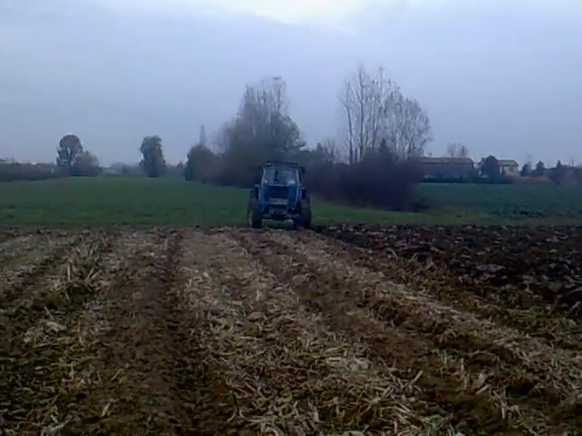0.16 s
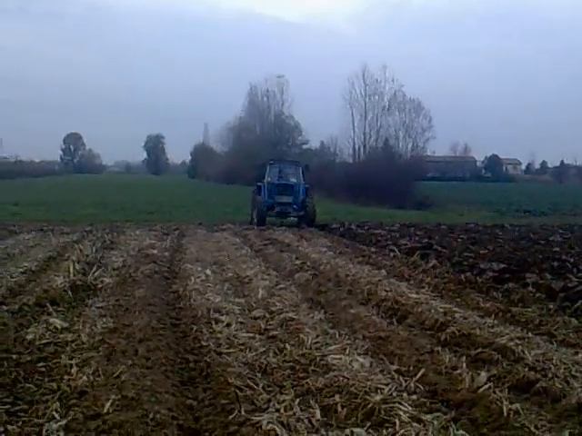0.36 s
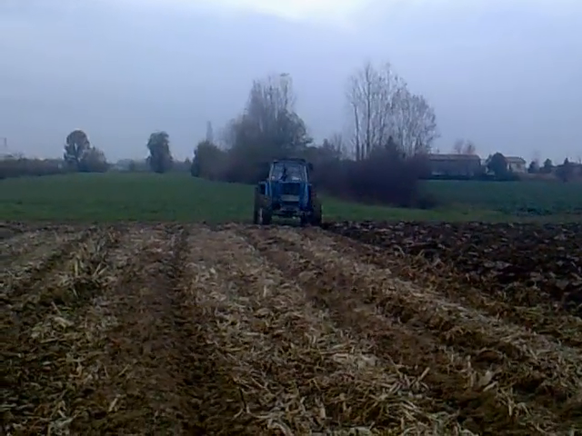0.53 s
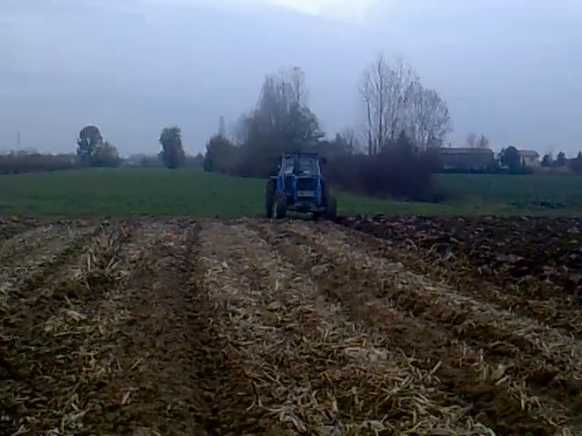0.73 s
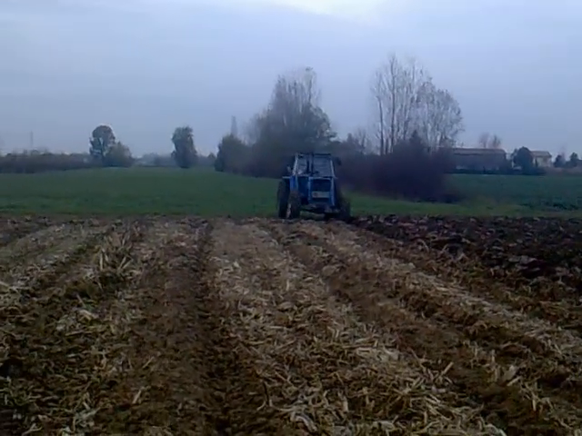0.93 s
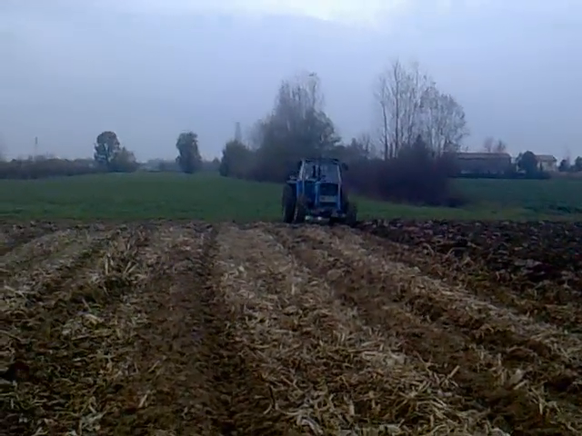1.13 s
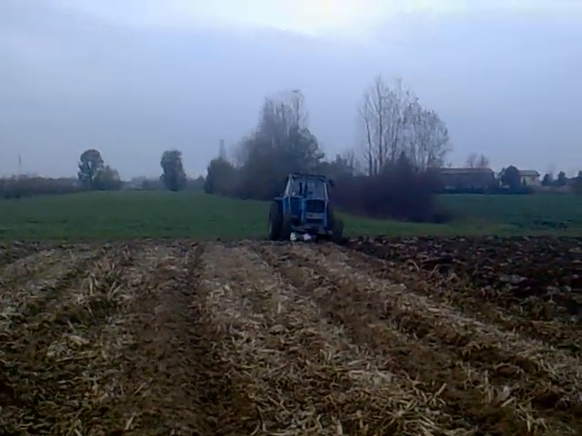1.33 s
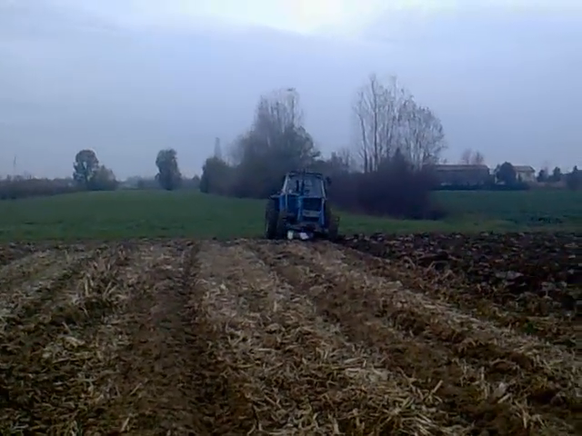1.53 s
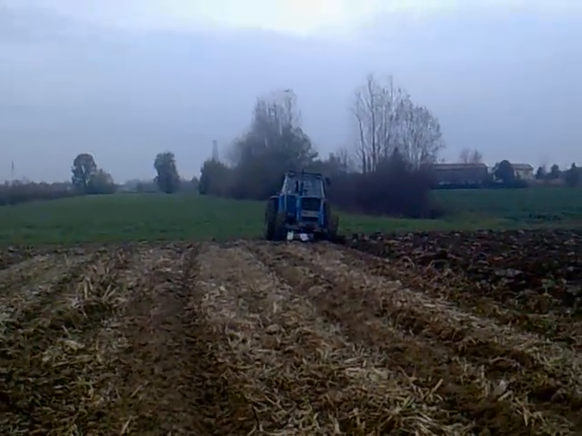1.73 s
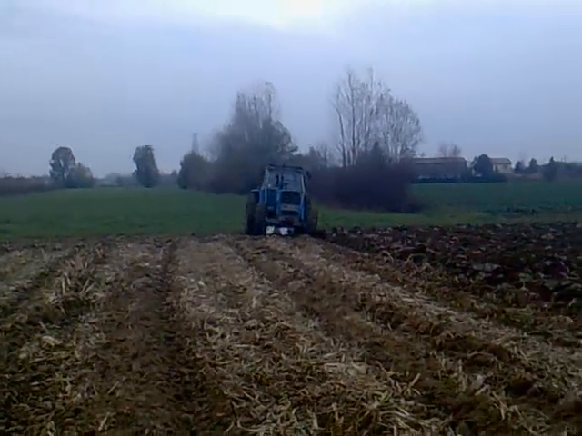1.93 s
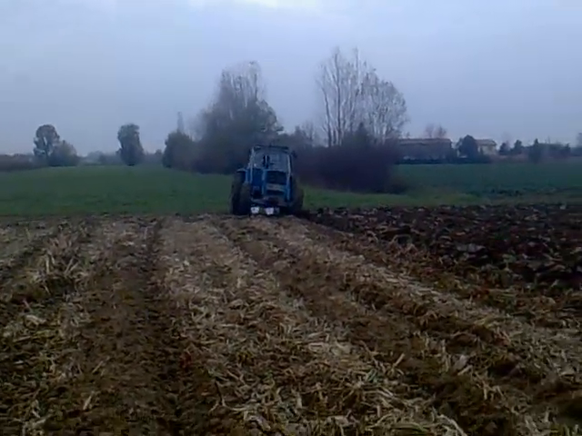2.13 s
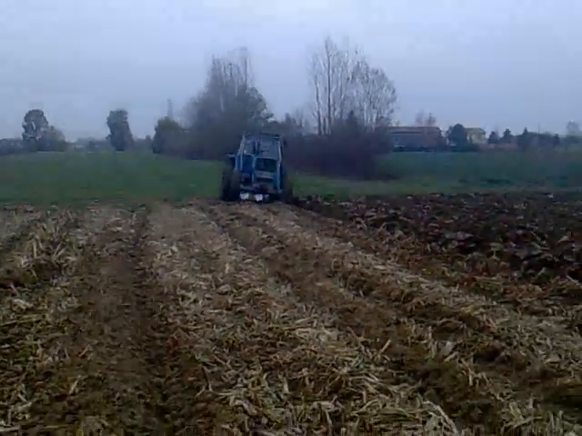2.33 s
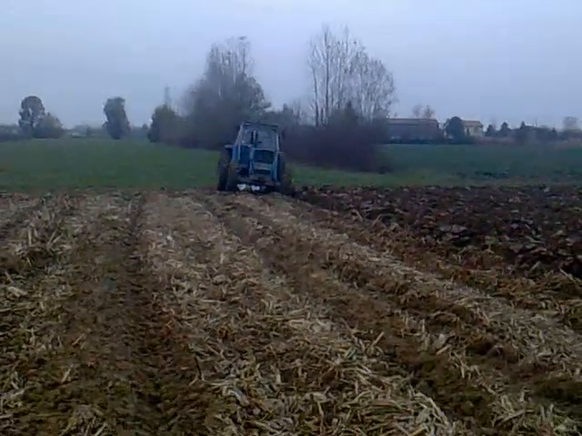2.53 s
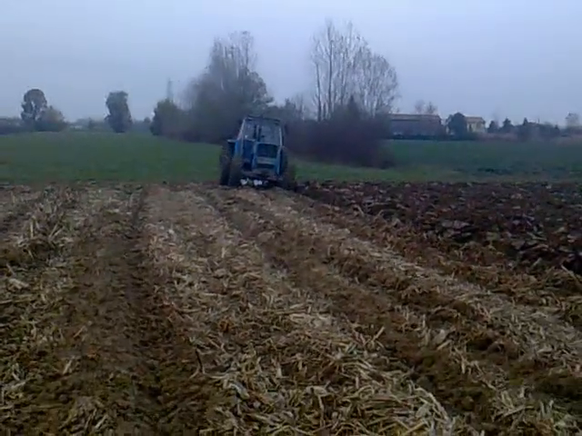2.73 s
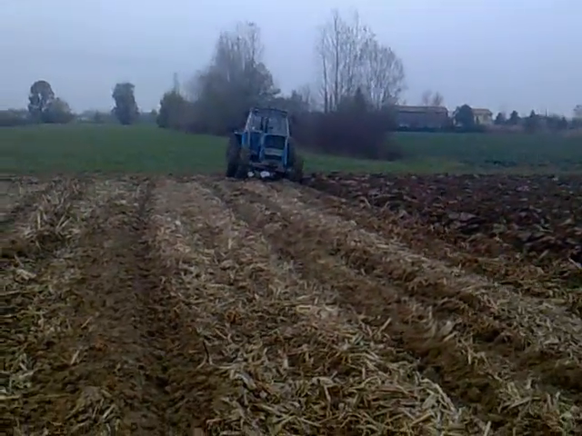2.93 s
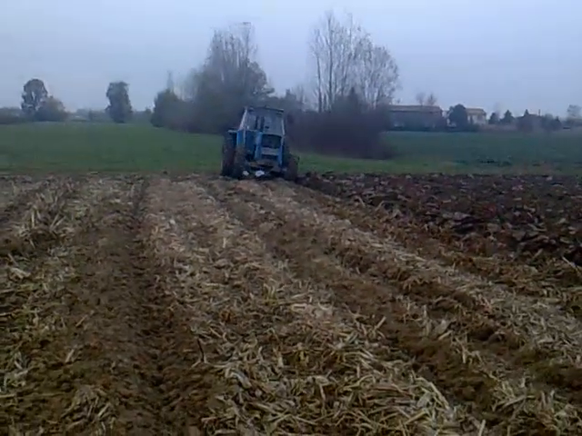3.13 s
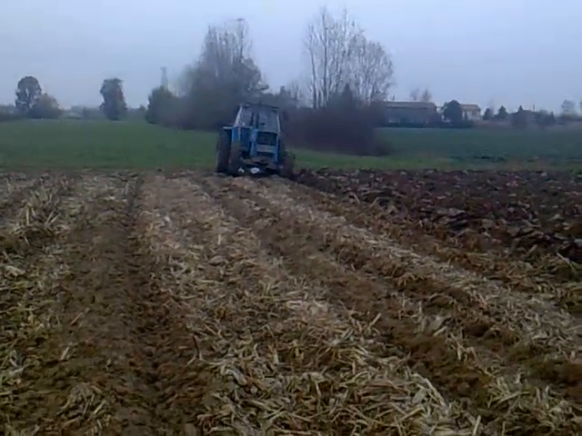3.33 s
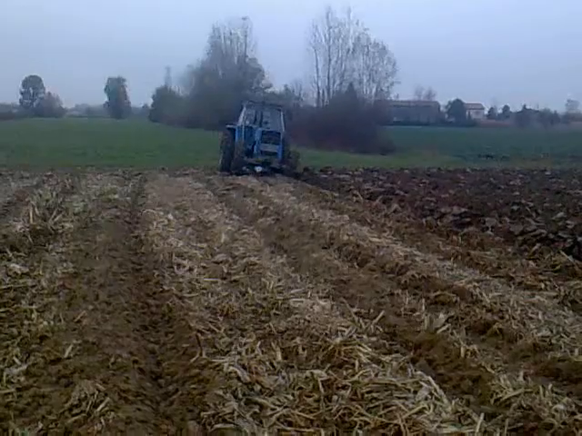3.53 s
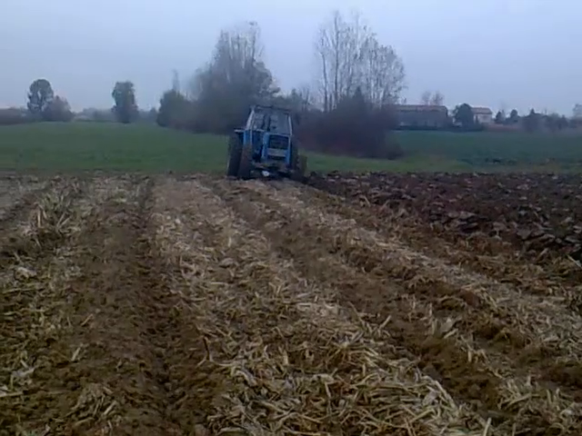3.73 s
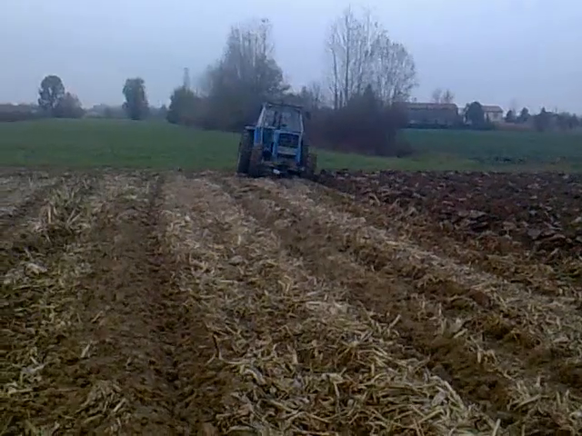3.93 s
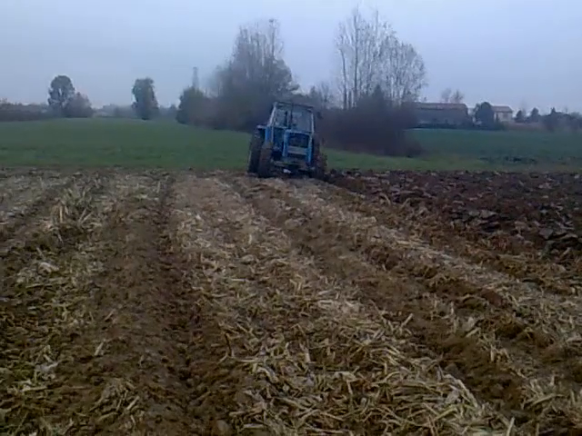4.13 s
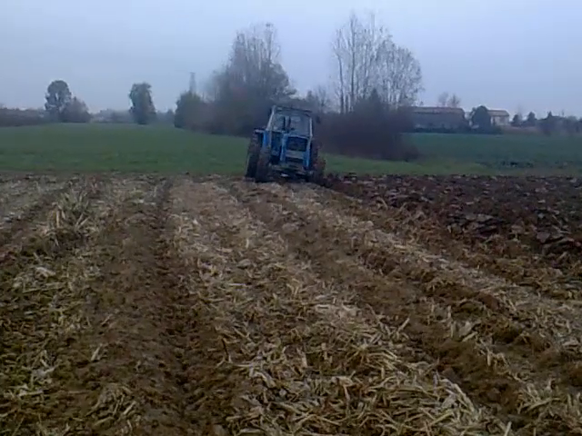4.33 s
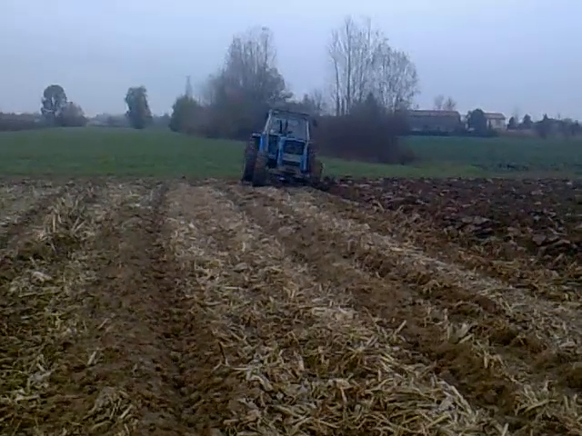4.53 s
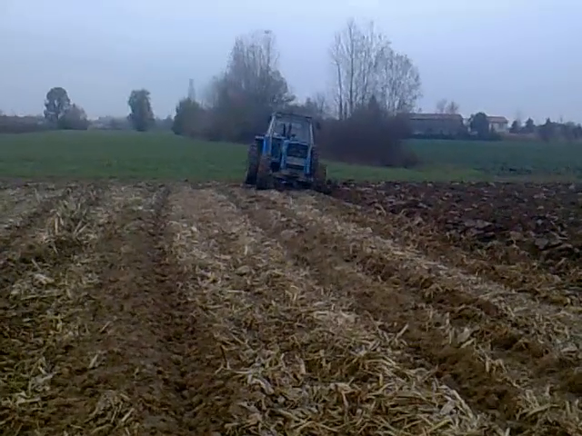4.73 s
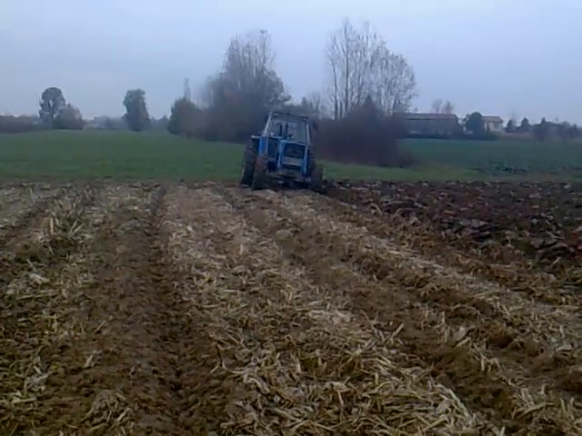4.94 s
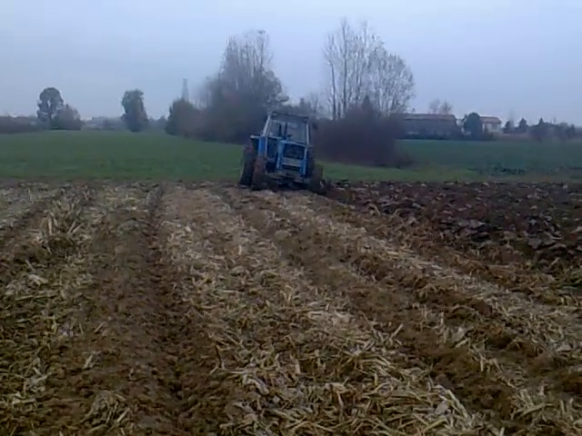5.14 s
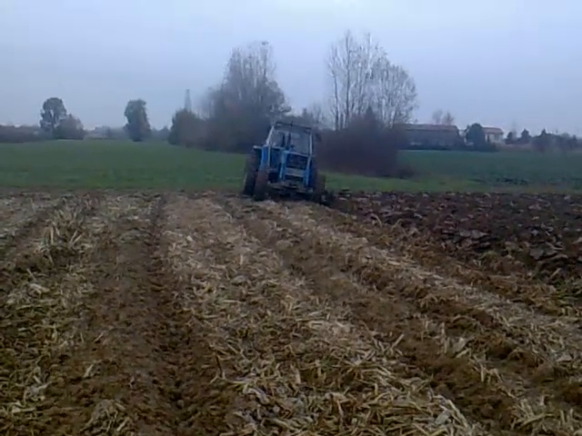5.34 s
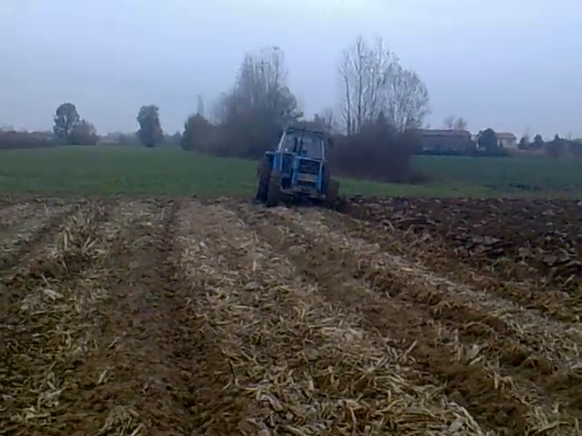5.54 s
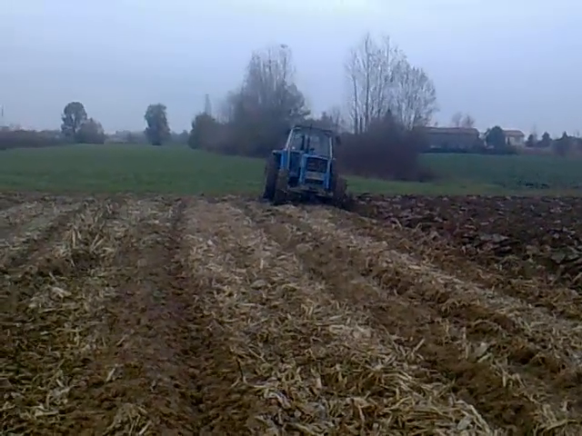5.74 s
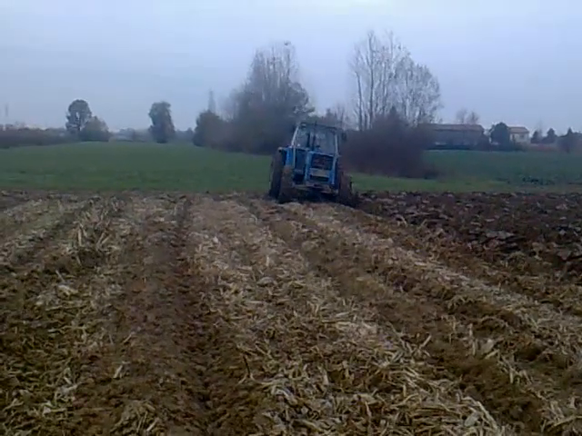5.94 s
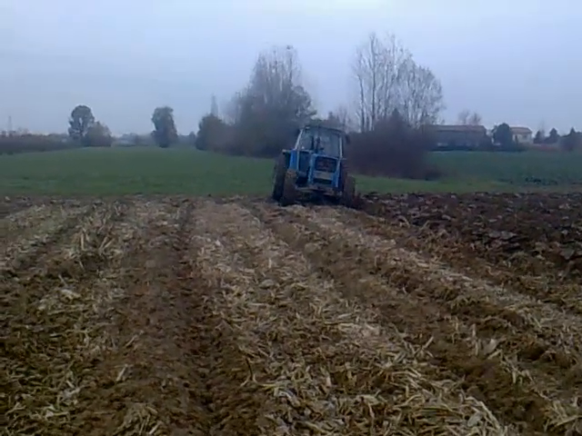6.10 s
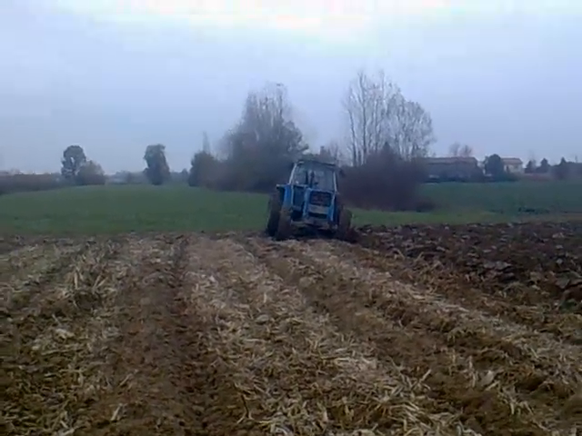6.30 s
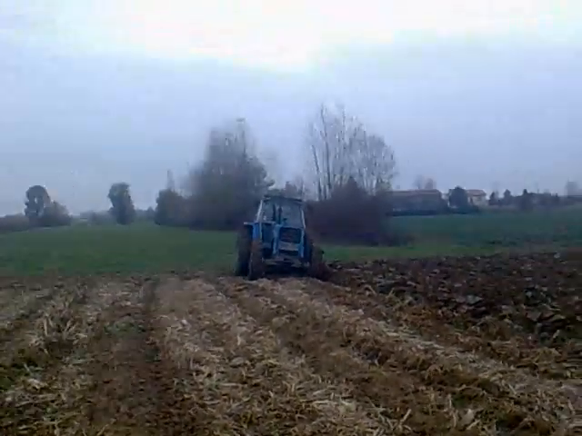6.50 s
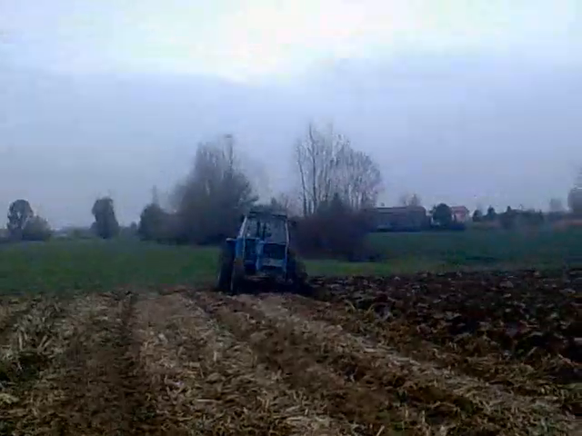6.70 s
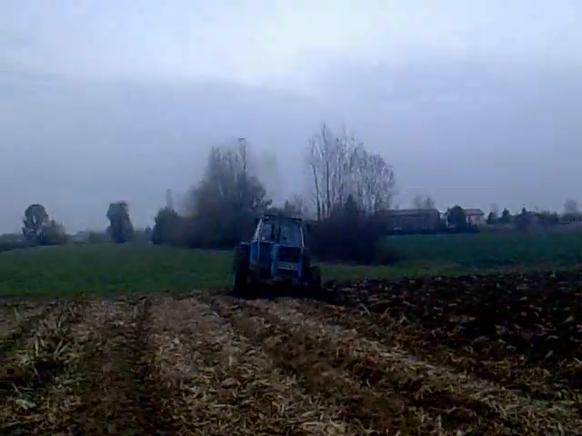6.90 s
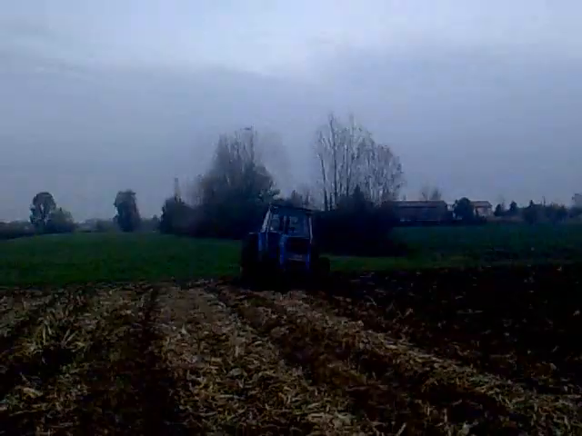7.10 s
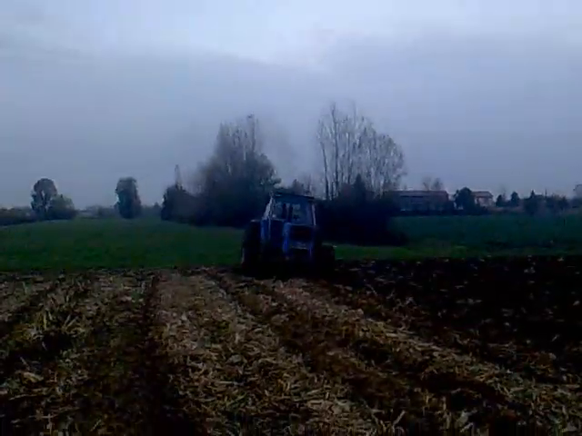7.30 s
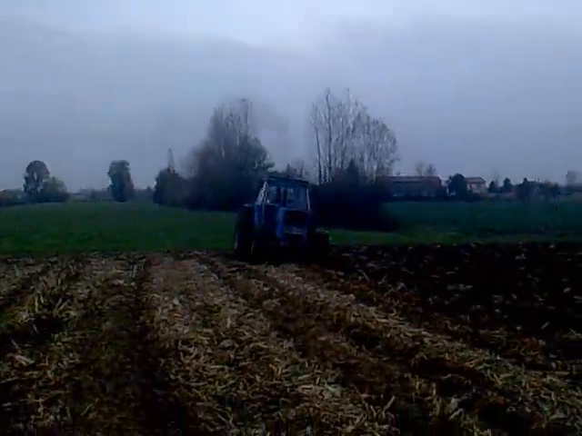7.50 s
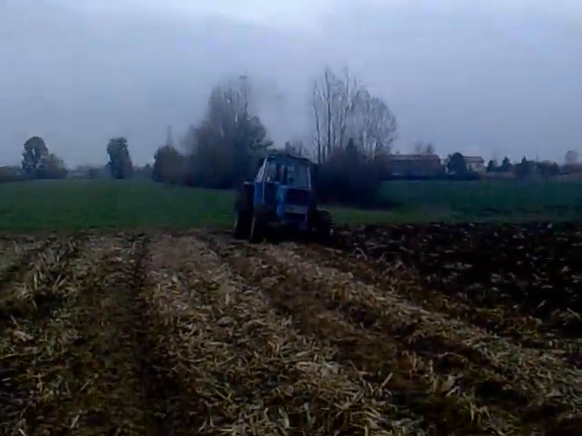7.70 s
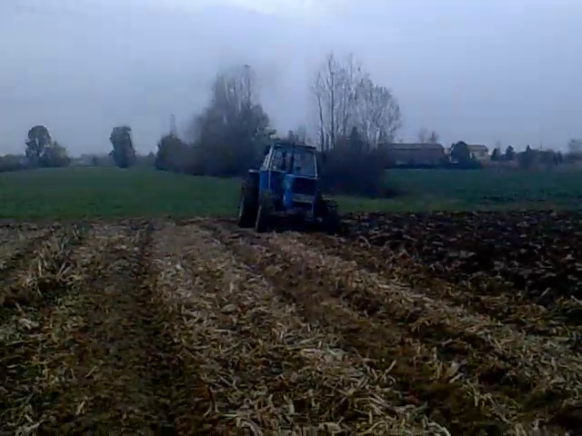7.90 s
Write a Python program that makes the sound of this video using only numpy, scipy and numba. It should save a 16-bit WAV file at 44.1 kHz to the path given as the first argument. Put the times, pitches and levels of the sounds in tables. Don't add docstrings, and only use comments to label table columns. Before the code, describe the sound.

A diesel tractor idles low some way off under buffeting wind, rattles faintly, then opens up and revs hard, knocking and roaring under load

```python
import sys
import numpy as np
from scipy import signal
from scipy.fft import rfft, irfft
from scipy.io import wavfile
from scipy.ndimage import uniform_filter1d
from numba import njit

SR = 44100
rng = np.random.default_rng(int(sys.argv[2]) if len(sys.argv) > 2 else 0)


def digitize_waveform(pressure):
    field = np.atleast_2d(pressure).T
    bounded = np.clip(field, -1, 1)
    quanta = np.round(bounded * 32767).astype(np.int16)
    wavfile.write(sys.argv[1], SR, quanta)


def gain_from_db(level_db):
    decades = np.asarray(level_db, float) / 20
    return 10 ** decades


N = 351036
TIME = np.arange(N) / SR
BARK_S = 5.585


def curves(table):
    s, *columns = np.transpose(table)
    return [np.interp(TIME, s, c) for c in columns]


def unit(x):
    return x / np.sqrt(np.mean(x ** 2))


def coloured(spectrum):
    hz, db = np.transpose(spectrum)
    f = np.maximum(np.arange(N // 2 + 1) * SR / N, 1)
    gain = gain_from_db(np.interp(np.log(f), np.log(hz), db))
    return unit(irfft(rfft(rng.standard_normal(N)) * gain, N))


def walk(rate_hz):
    k = int(SR / rate_hz)
    held = np.repeat(rng.standard_normal(N // k + 1), k)
    return unit(uniform_filter1d(held, k)[:N])


def peak(x, hz, width_hz):
    return signal.lfilter(*signal.iirpeak(hz, hz / width_hz, SR), x)


def jolt(start_s, decay_s):
    return (TIME >= start_s) * np.exp(-np.maximum(TIME - start_s, 0) / decay_s)


def blows(phase, pattern_db, scatter_db, burst, steady, click_db):
    phase = np.maximum.accumulate(phase + .022 * walk(60))
    count = np.floor(phase).astype(int)
    scatter = scatter_db * rng.standard_normal(N // 100)[count]
    size = gain_from_db(np.array(pattern_db)[count % 6] + scatter)
    click = np.diff(count, prepend=count[0]) * size
    age = phase % 1 / burst
    noise = (steady + size * age * np.exp(1 - age)) * rng.standard_normal(N)
    return unit(noise) + gain_from_db(click_db) * unit(click)


SPEEDS_HZ = [50, 70, 105]


def ring(phase, hz, modes, patchy_db, spread, **blow):
    out = 0
    for k, (mode_hz, width_hz, *speed_db) in enumerate(modes):
        tone = peak(blows(phase - spread * rng.random(), **blow), mode_hz, width_hz)
        level_db = np.interp(hz, SPEEDS_HZ, speed_db) + patchy_db * walk(9)
        out = out + (-1) ** k * gain_from_db(level_db) * tone
    return out / np.sqrt(uniform_filter1d(out ** 2, SR))


# freq_hz, level_db_per_hz
EDDIES = [(100, -25), (180, 4), (300, -3.5), (420, -10.5), (600, -15), (1500, -90)]


def swings(events):
    out = np.zeros(N)
    eddies = coloured(EDDIES)
    for (first_s, db, first_hz, gap_s), chance in zip(events, rng.uniform(-1.13, 1, (60, 3, 2))):
        for k, (turn, shift) in enumerate(chance[:3 if gap_s else 1]):
            s = first_s + k * gap_s
            hz = first_hz * (1 + 0.28 * shift * (k > 0))
            i = np.arange(int((s - .03) * SR), int((s + .03) * SR))
            cycles = (i / SR - s) * hz
            swing = np.cos(2 * np.pi * cycles + 1.9 * turn) + gain_from_db(-20) * eddies[i]
            out[i] += gain_from_db(db - 4 * k) * np.exp(-(cycles / 0.5) ** 2) * swing
    return out


# freq_hz, level_db_per_hz
WIND = [(20, -25), (40, 0.5), (80, 0), (150, -6.5), (250, -8.5), (300, -15.5), (350, -21), (450, -16.5),
        (700, -40), (3000, -58), (6000, -90)]
# time_s, level_db
GUST = [(0, -38), (1, -36), (1.6, -39.5), (2.5, -39), (3.5, -38), (4.4, -33), (5, -29), (5.5, -35),
        (6.3, -37), (7.96, -41)]
# peak_s, level_db, pitch_hz, follower_gap_s (0 =
THUMPS = [(.247, -18.5, 103, .036), (.345, -17, 85, 0.063), (0.547, -29, 100, 0.059),
          (0.775, -18, 105, 0.02), (0.969, -22, 104, 0.025), (1.325, -19.5, 94, 0.056),
          (1.644, -22, 110, 0.019), (1.797, -20, 97, 0), (1.846, -17.5, 115, 0.027), (1.86, -16, 229, 0),
          (2.16, -21.5, 95, .059), (2.811, -20.5, 95, 0.014), (3.007, -23, 107, 0.023),
          (3.626, -17.5, 89, 0.064), (3.733, -18.5, 114, 0.045), (3.834, -15.5, 119, 0),
          (3.984, -19, 75, 0.00099), (4.078, -19, 135, 0.07), (4.178, -16.5, 110, .044),
          (4.514, -18, 119, 0.044), (4.609, -17, 130, .018), (4.693, -16, 90, 0.0078),
          (4.812, -11, 139, 0.0046), (4.867, -13.5, 149, 0.02), (5.046, -11, 106, 0.034),
          (5.135, -12, 142, .04), (5.215, -14, 153, 0.028), (5.311, -20.5, 129, 0.017),
          (5.482, -17, 123, 0.015), (5.871, -18, 92, 0.0053)]


def wind():
    rumble = gain_from_db(curves(GUST)[0] + 0.65 * walk(14)) * coloured(WIND)
    return rumble + swings(THUMPS)


def squeak():
    centre_s, half_s, level_db = 3.4, .3, -61
    rub = peak(rng.standard_normal(N), 8000, 60)
    swell = np.exp(-((TIME - centre_s) / half_s) ** 2)
    return gain_from_db(level_db + 2.5 * walk(9)) * swell * unit(rub)


# multiple, top_speed_db, loss_db_per_octave
WHINES = [(.6667, -39.5, 3), (2.5, -55, 11), (4, -50, 17), (1.667, -49.5, -4.5)]
# multiple, loudest_s, level_db, rise_db_per_s2, fall_db_per_s
GEARS = [(20.82, 7.63, -37, 10, 37), (40.9, 1.7, -56.5, 30, 1), (11.34, 3.3, -43.5, 25, 92),
         (2.364, 7.41, -30, 10, 10), (1.672, 6.6, -41.5, 11, 150)]


def whine(phase, hz):
    out = np.zeros(N)
    for multiple, db, loss_db in WHINES:
        level_db = db + loss_db * np.log2(hz / 110) + 2.2 * walk(11)
        out += gain_from_db(level_db) * np.sin(2 * np.pi * multiple * phase)
    for multiple, s, db, rise, fall in GEARS:
        swell_db = db + np.where(TIME < s, -rise * (TIME - s) ** 2, fall * (s - TIME))
        out += gain_from_db(swell_db + 1.6 * walk(25)) * np.sin(2 * np.pi * multiple * phase)
    return np.sqrt(2) * out


# time_s, effort_0_to_1
LOAD = [(0, 0.22), (.3, 0.44), (1.25, 0.23), (1.75, 0.05), (1.86, 0.38), (2.75, 0.36), (3.0, 0.43),
        (3.25, 0.63), (4.0, 0.53), (4.25, 0.64), (4.5, 0.61), (5.55, 0.64), (5.61, 0.96), (5.7, 0.86),
        (6.4, .95), (7.75, 1), (7.82, 0.67), (7.96, 0.69)]
# effort_0_to_1, hood_db, knock_db, clatter_db, rattle_db
EFFORT = [(0, -54, -40, -71, -78), (.3, -50, -36.5, -57.5, -67), (.6, -46, -35, -50, -57),
          (.7, -40.5, -31.5, -44, -53), (1, -34, -27, -34, -37)]
REV_DB_PER_OCTAVE = [8, 4.7, .1, 3.8]
HOOD_WAKES_HZ = [76, 86]
# start_s, length_s, extra_db
SHAKES = [(1.853, 0.97, 14.5), (3.138, .5, 5)]


def layer_levels(hz):
    load = curves(LOAD)[0]
    effort, *laws_db = np.transpose(EFFORT)
    octaves = np.log2(np.maximum(hz / 66, 1))
    levels_db = [np.interp(load, effort, db) + rev_db * octaves
                 for db, rev_db in zip(laws_db, REV_DB_PER_OCTAVE)]
    levels_db[0] = levels_db[0] + np.interp(hz, HOOD_WAKES_HZ, [0, 4.5])
    attack_s, release_s = 0.048, .25
    for s, length_s, db in SHAKES:
        corners_s = [0, attack_s, length_s, length_s + release_s]
        levels_db[3] = levels_db[3] + db * np.interp(TIME - s, corners_s, [0, 1, 1, 0])
    return levels_db


# freq_hz, width_hz, low_speed_db, mid_speed_db, high_speed_db
LINKS = [(5690, 98, -5, 0, 1), (5990, 44, 1.5, 5, 0), (6360, 170, -7, -1, -1), (6830, 65, -2, 7, 4.5),
         (7270, 370, -4, 1, 0), (7510, 87, -9, 9, -1), (7970, 110, -6, -8, -2), (8640, 1200, -15, -17, -15),
         (10000, 1400, -15, -13, -24)]


def rattle(phase, hz, pattern_db):
    rings = ring(phase - .5, hz, LINKS, 1.2, .3, pattern_db=pattern_db, scatter_db=3,
                 burst=.17, steady=.25, click_db=-8)
    throb_db = np.cos(2 * np.pi * (phase - 2) / 6)
    return gain_from_db(throb_db) * rings


# freq_hz, width_hz, low_speed_db, mid_speed_db, high_speed_db
HEAD = [(2750, 200, -22, 2, -6), (3790, 117, 4, -3.5, -6), (4126, 84, 5, -2.5, 3), (4360, 35, 1, 7, 2.5),
        (4610, 56, -0.5, 6, -4), (4967, 200, -2.5, 0.5, 0), (5415, 120, -2.5, -2.5, 2.5)]


def clatter(phase, hz, pattern_db):
    return ring(phase - .15, hz, HEAD, 1.2, .4, pattern_db=pattern_db, scatter_db=3.5,
                burst=.15, steady=.2, click_db=-6)


# freq_hz, width_hz, low_speed_db, mid_speed_db, high_speed_db
HOOD = [(540, 60, -3, -2, 0), (490, 50, -4, -5, -7), (590, 60, -4, -6, -6)]


def hood(phase, hz, pattern_db):
    rings = ring(phase - .15, hz, HOOD, .7, .1, pattern_db=pattern_db, scatter_db=1.0,
                 burst=.3, steady=.12, click_db=7)
    return 1.3 * signal.lfilter(*signal.iirpeak(535, 3.3, SR), rings)


# freq_hz, width_hz, low_speed_db, mid_speed_db, high_speed_db
BLOCK = [(769, 106, 1, 2.5, 1.5), (682, 255, -8.5, -15, -3), (922, 180, -16, -32, -22.5),
         (1021, 48, -6, -5, 1), (1214, 102, -4, -4, -5), (1489, 63, -8.5, -8.5, -2),
         (1695, 150, -9.5, -8, -19.5), (1970, 114, -14.5, -11.5, -7), (2238, 98, -7.5, -7.5, -12.5),
         (2514, 240, -14, -18, -15.5), (2630, 81, -19, -19, -16)]


def knock(phase, hz, pattern_db):
    return ring(phase - .45, hz, BLOCK, 1.2, .4, pattern_db=pattern_db, scatter_db=2,
                burst=.2, steady=.7, click_db=-11)


# six in firing order, each in level_db
CYLINDERS = [
    (0, -9, -15, -11, -15, -11),
    (-1, 0, -3, 0, -3, 0),
    (-4, 0, -2, -5, -3, 0),
    (0, 0, -6, 0, -6, 0),
]
# time_s, extra_db
HARD = [(5.755, 9), (5.87, 5.5), (6.203, 4.5), (6.421, 4.5), (7.003, 3), (7.562, 3), (7.615, 1)]


def engine_body(phase, hz):
    hood_db, knock_db, clatter_db, rattle_db = layer_levels(hz)
    treble = gain_from_db(clatter_db) * clatter(phase, hz, CYLINDERS[2])
    treble = treble + gain_from_db(rattle_db) * rattle(phase, hz, CYLINDERS[3])
    out = gain_from_db(walk(15)) * treble
    out = out + gain_from_db(hood_db) * hood(phase, hz, CYLINDERS[0])
    out = out + gain_from_db(knock_db) * knock(phase, hz, CYLINDERS[1])
    out = out * gain_from_db(jolt(BARK_S, 0.69) * np.cos(2 * np.pi * (phase - 0.59)))
    out = out * gain_from_db(sum(db * jolt(s, 0.011) for s, db in HARD))
    out = signal.lfilter(*signal.iirnotch(324, 1.6, SR), out)
    return signal.sosfilt(signal.butter(4, 9500, fs=SR, output="sos"), out)


# freq_hz, width_hz, low_speed_db, mid_speed_db, high_speed_db
BARK = [(764, 120, 1, 1, 4), (2250, 120, -9, -9, -11), (4770, 250, -13, -13.5, -12)]


def bark(phase, hz):
    rings = ring(phase - 1.5, hz, BARK, 1, .1, pattern_db=(0, -7, 0, -7, 0, -7), scatter_db=2.5,
                 burst=.3, steady=.05, click_db=4)
    return gain_from_db(-28) * jolt(BARK_S, .7) * rings


def exhaust_lump(phase):
    from_s, to_s, at_firings, level_db, pitch_hz = 2.3, 3.55, 1.35, -23.5, 82
    beats_s = TIME[1:][np.diff(np.floor((phase - at_firings) / 6)) > 0]
    return swings([(s, level_db, pitch_hz, 0) for s in beats_s if from_s < s < to_s])


# freq_hz, level_db_per_hz
ROAR = [(60, -12), (130, -0.5), (250, -1), (330, -10), (500, -22), (1000, -60)]


def exhaust_roar(tone_db):
    return gain_from_db(tone_db - 15.5 + 1.2 * walk(15)) * coloured(ROAR)


# firing_hz, octave_over_tone_db
OCTAVE = [(48, 2), (54, -2), (62, -7.5), (69, -16), (80, -14.5), (90, -31), (105, -32), (113, -20.5)]


def exhaust(phase, hz, tone_db):
    octave_db = tone_db + np.interp(hz, *np.transpose(OCTAVE))
    out = gain_from_db(tone_db + 0.19 * walk(6.6)) * np.sin(2 * np.pi * phase)
    out += gain_from_db(octave_db + 2.0 * walk(8.9)) * np.sin(4 * np.pi * phase + 1.0)
    return np.sqrt(2) * out


# time_s, firing_hz, exhaust_tone_db
ENGINE = [(0.0, 62.87, -40.0), (0.3, 63.43, -37.0), (0.9, 61.65, -37.0), (1.2, 61.61, -49.0),
          (1.8, 48.1, -50.0), (2.1, 48.94, -38.0), (3.0, 51.64, -39.0), (3.3, 51.01, -34.0),
          (3.9, 54.61, -35.0), (4.5, 54.26, -37.0), (4.8, 53.06, -38.0), (5.5, 54.12, -33.0),
          (6.0, 71.61, -26.0), (6.65, 92.66, -23.0), (6.9, 100.52, -22.0), (7.3, 106.08, -22.0),
          (7.75, 116.74, -22.0), (7.96, 113.69, -22.0)]


def scene():
    hz, tone_db = curves(ENGINE)
    phase = np.cumsum(hz) / SR + 6
    out = wind() + squeak() + whine(phase, hz)
    out = out + engine_body(phase, hz) + bark(phase, hz)
    out = out + exhaust_lump(phase) + exhaust_roar(tone_db) + exhaust(phase, hz, tone_db)
    return out[None]


@njit
def follow(power, attack, release):
    out, e = np.empty(len(power)), power[0]
    for i in range(len(power)):
        e += (power[i] - e) * (attack if power[i] > e else release)
        out[i] = e
    return out


def roll_off(x):
    return signal.sosfilt(signal.butter(12, 15720, fs=SR, output="sos"), x)


# freq_hz, level_db_per_hz
HISS = [(1000, 1.5), (5000, -8), (9000, -10.5), (12000, -5), (15700, -3.5)]


def record(dry):
    knee_db, slope, attack_s, release_s = -22, 0.94, 0.03, 0.073
    x = dry + gain_from_db(-49) * coloured(HISS)
    power = uniform_filter1d(x[0] ** 2, 400)
    loud_db = 10 * np.log10(follow(power, 1 / (attack_s * SR), 1 / (release_s * SR)))
    x = x * gain_from_db(slope * np.minimum(loud_db - knee_db, 0))
    return roll_off(x)


dry = scene()
out = record(dry)
digitize_waveform(out)
```